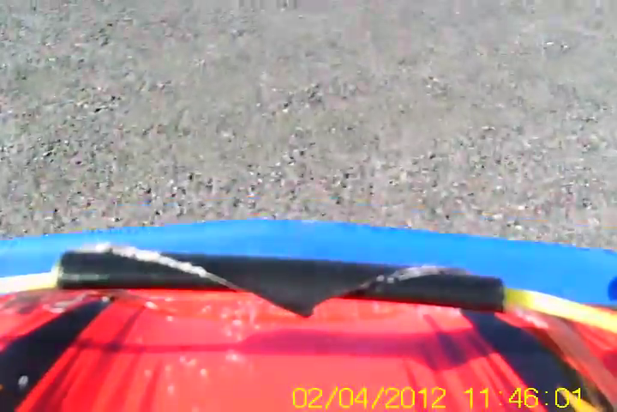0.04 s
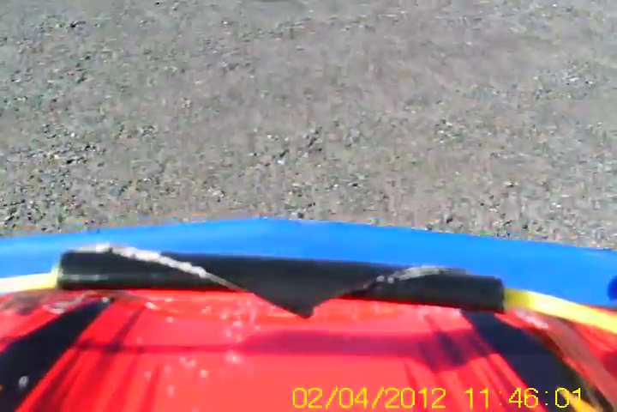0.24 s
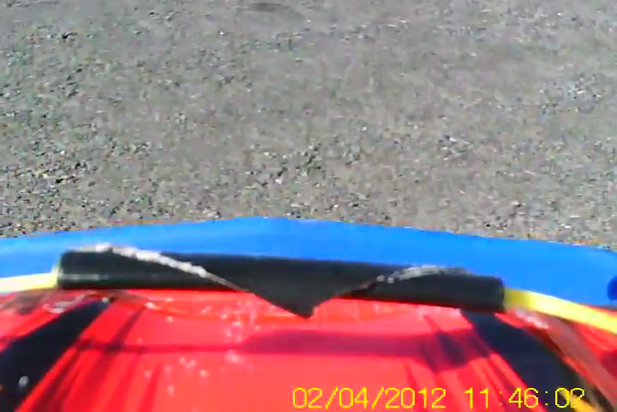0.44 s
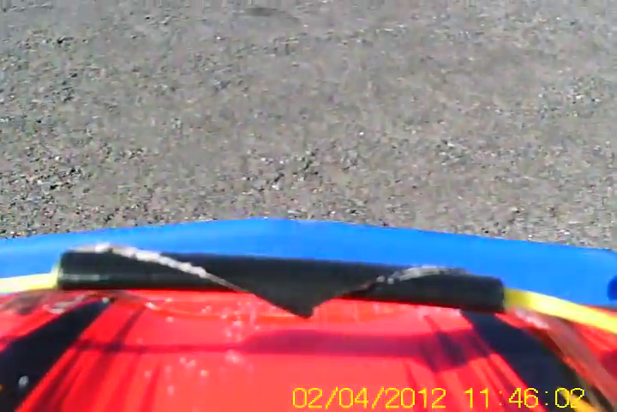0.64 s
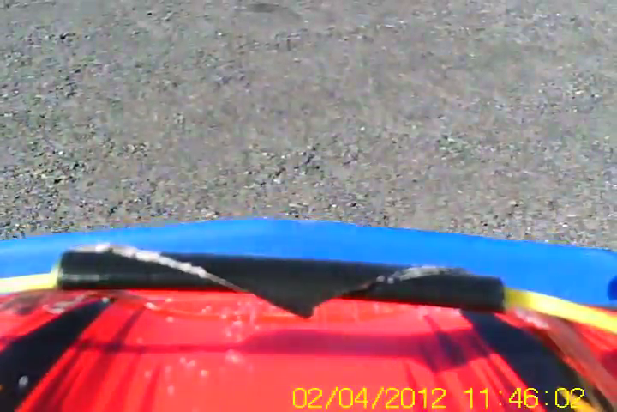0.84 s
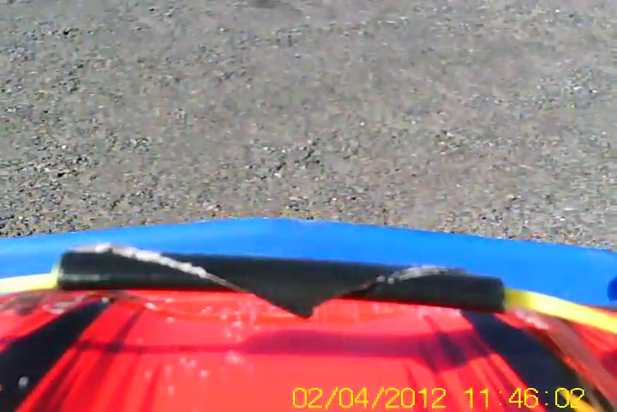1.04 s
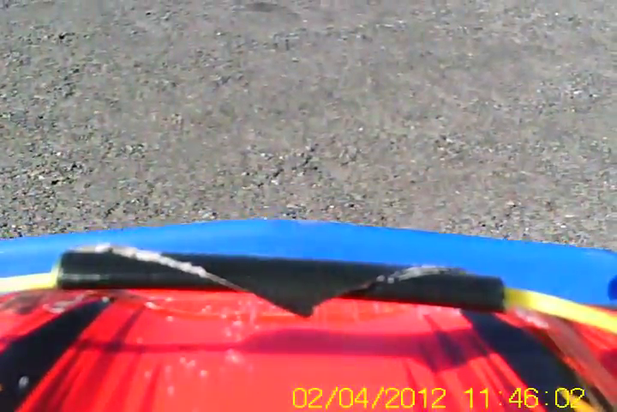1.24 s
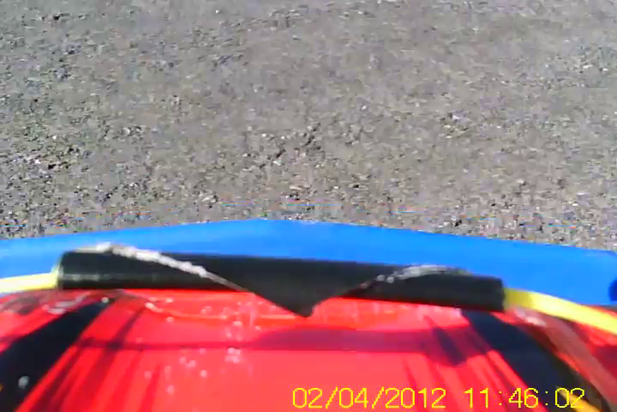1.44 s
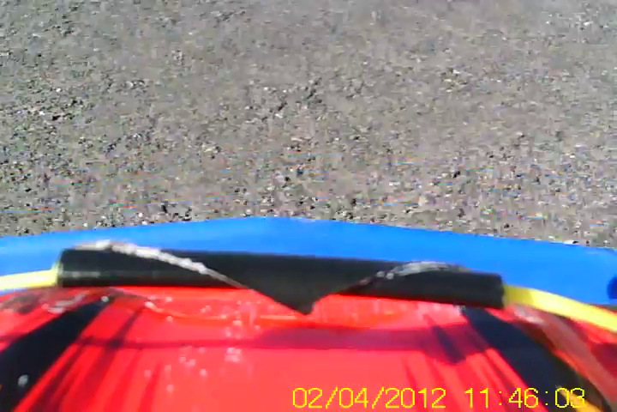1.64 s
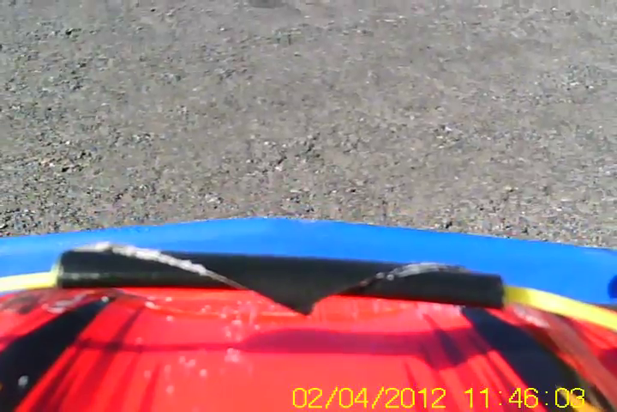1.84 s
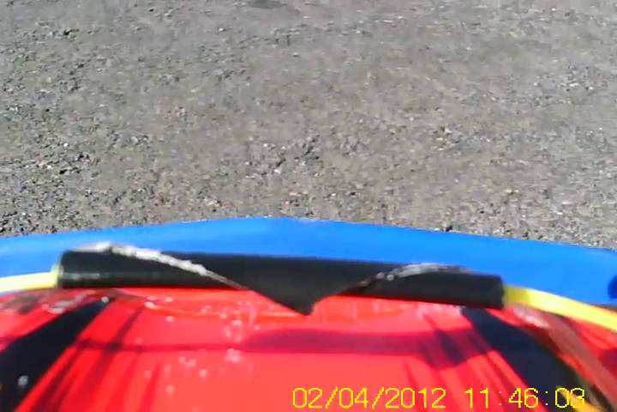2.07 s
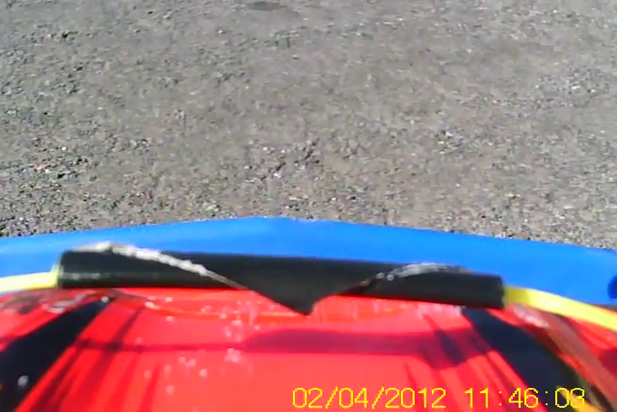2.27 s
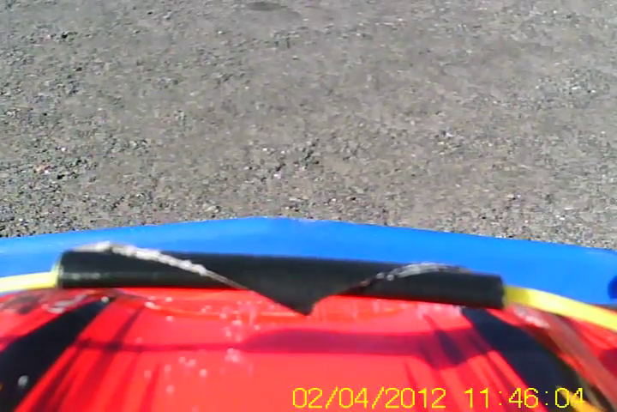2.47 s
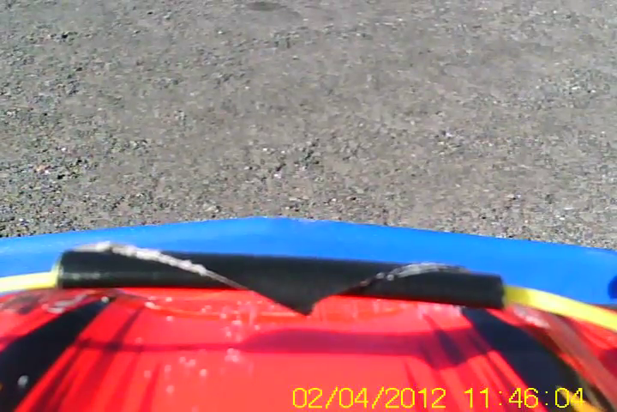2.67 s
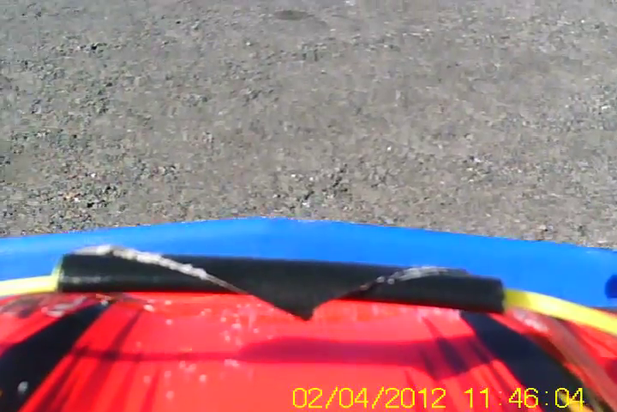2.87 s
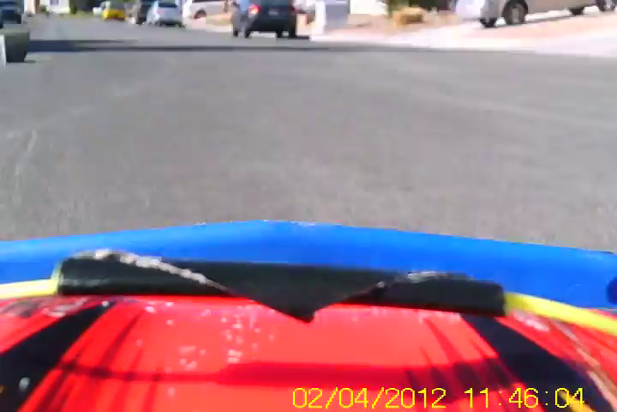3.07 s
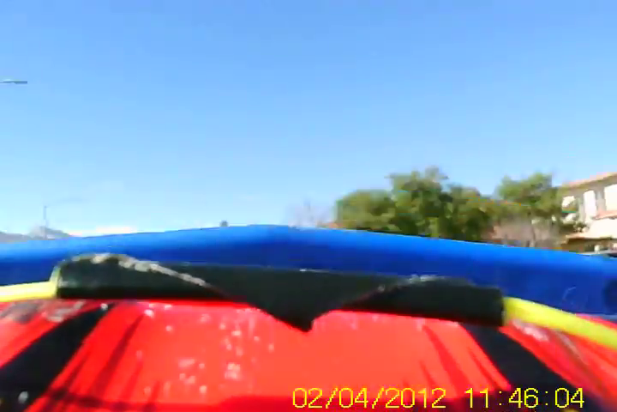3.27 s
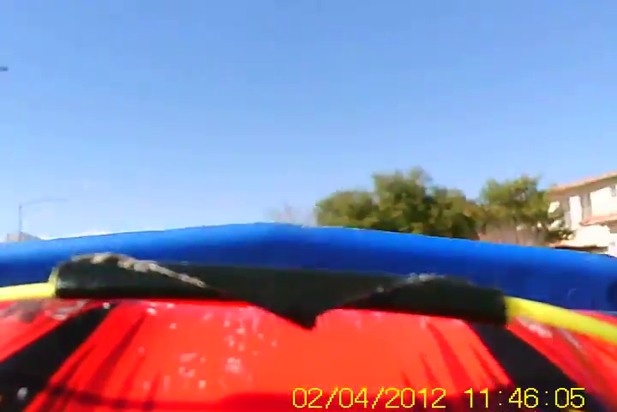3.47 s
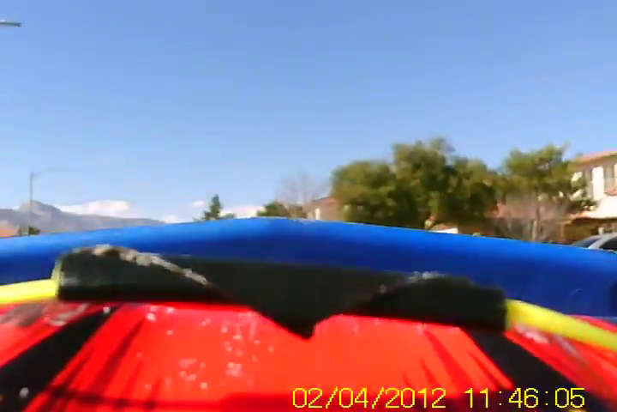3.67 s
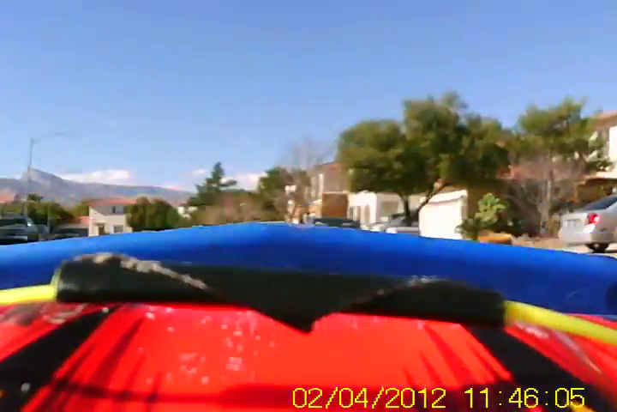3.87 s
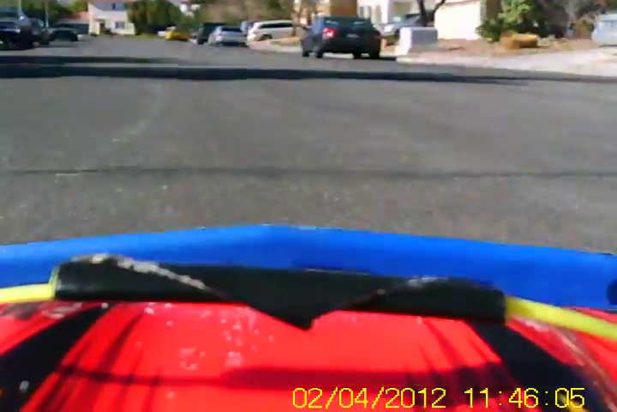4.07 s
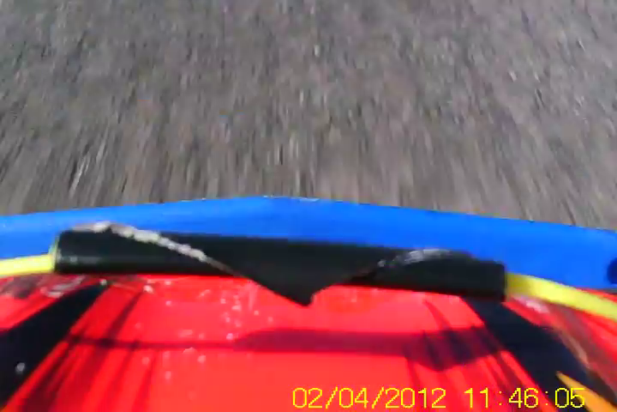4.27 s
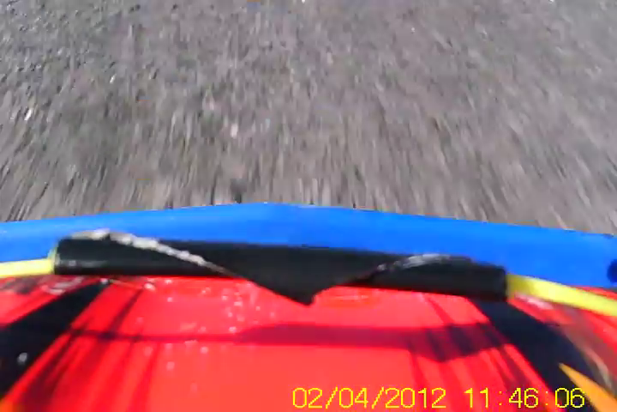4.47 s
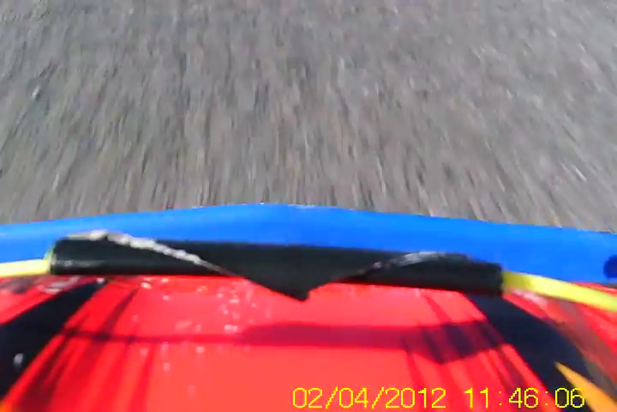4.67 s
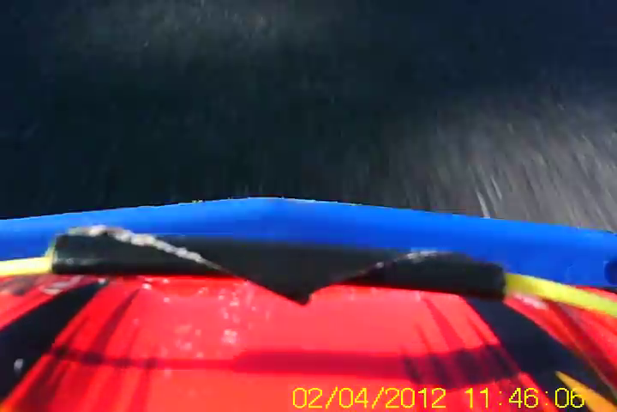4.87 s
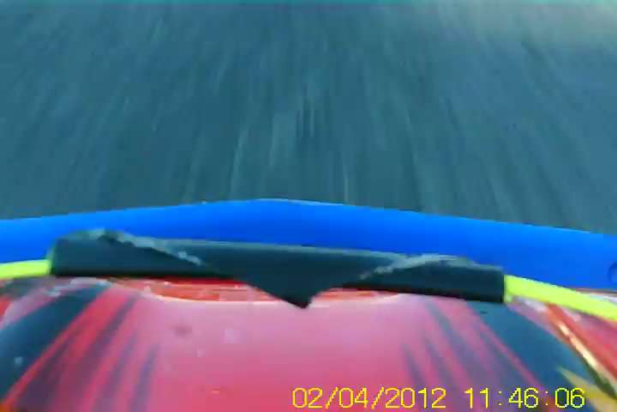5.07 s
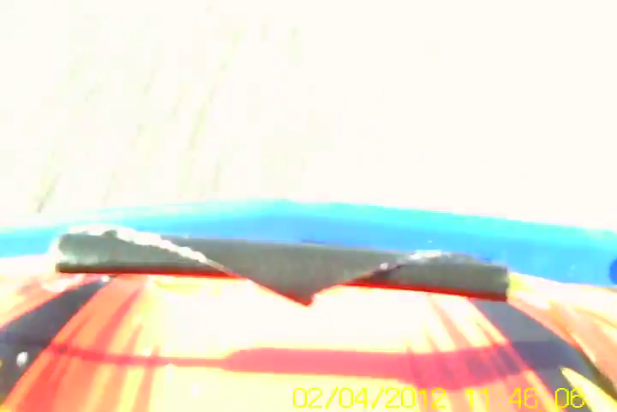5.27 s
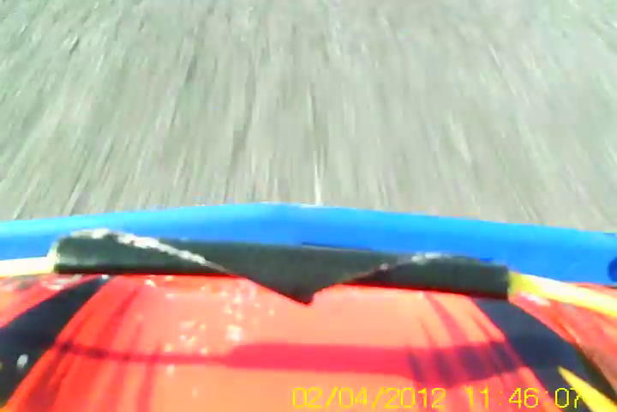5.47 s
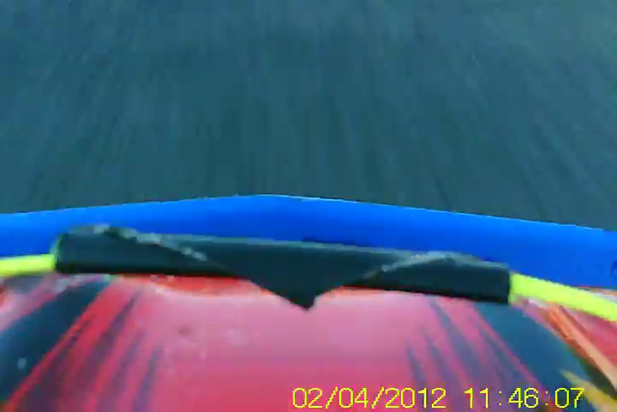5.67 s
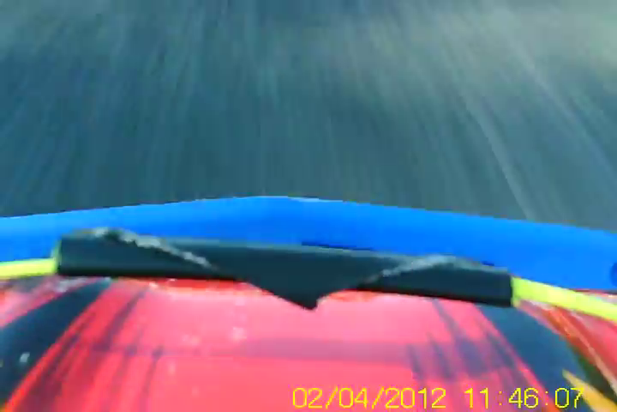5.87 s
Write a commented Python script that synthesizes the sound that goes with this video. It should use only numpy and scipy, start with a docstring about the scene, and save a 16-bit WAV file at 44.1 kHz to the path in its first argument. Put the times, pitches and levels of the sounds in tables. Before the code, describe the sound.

A toy car's shell ticks and gets one sharp bang, then its tiny motor chirps, surges, clatters and climbs into a rough gear whine with tyre rumble.

```python
"""Toy electric car: handled, knocked, driven off

A microphone rides on the plastic shell: rough gear tones filtered by shell resonances make the whine.
Filtered random contacts make the tyre rumble, rattle, scrape, jolts, ticks and rubbing.
At rest the shell ticks and takes one hard knock (a noise burst with rebounds); a small motor chirps.
Then the car lurches off in surges and runs up to full speed, over puffs of air, a faint hum and hiss."""
import sys
import numpy as np
from scipy import signal
from scipy.fft import rfft, irfft
from scipy.io import wavfile

SR = 44100
rng = np.random.default_rng(int(sys.argv[2]) if len(sys.argv) > 2 else 0)


def master_out(mix):
    """Clip the mix to full scale and print it as 16-bit PCM to the path in sys.argv[1]."""
    frames = np.transpose(np.atleast_2d(mix))
    ceiling = np.clip(frames, -1, 1)
    pcm = np.round(ceiling * 32767).astype(np.int16)
    wavfile.write(sys.argv[1], SR, pcm)


N = 260631
TIME = np.arange(N) / SR


def from_db(db):
    """Decibels to gain."""
    return 10 ** (np.asarray(db) / 20)


def rms_one(x):
    """Scale to unit power."""
    return x / np.sqrt(np.mean(x ** 2) + 1e-20)


def onset(start_s, attack_s):
    """Linear rise from 0 to 1."""
    return np.clip((TIME - start_s) / attack_s, 0, 1)


def swell(peak_s, rise_s, fall_s):
    """Bell-shaped rise to 1 and fall."""
    width_s = np.where(TIME < peak_s, rise_s, fall_s)
    return np.exp(-np.minimum(((TIME - peak_s) / width_s) ** 2, 40))


def drift(cutoff_hz):
    """Low-passed noise of unit power."""
    low_pass = signal.butter(2, cutoff_hz, fs=SR, output="sos")
    settled = signal.sosfilt(low_pass, rng.standard_normal(N + SR))[SR:]
    return rms_one(settled)


def colour(x, spectrum, size=8192):
    """Minimum-phase filter through the spectrum's points, steep outside; keeps the power of white noise."""
    hz, db = np.transpose(spectrum)
    octave = np.log2(np.maximum(np.fft.rfftfreq(size, 1 / SR), 2))
    points = np.log2(hz)
    outside = np.abs(octave - np.clip(octave, points[0], points[-1]))
    gain_db = np.interp(octave, points, db) - np.minimum(36 * outside, 70)
    cepstrum = irfft(np.log(from_db(gain_db)))
    cepstrum[1:size // 2] *= 2  # fold to minimum phase
    response = irfft(np.exp(rfft(cepstrum[:size // 2], size)))
    return signal.fftconvolve(x, response / np.linalg.norm(response))[:N]


def grains(per_s, spread_db):
    """Random tiny contacts of uneven strength, unit power."""
    strength = from_db(spread_db * np.minimum(rng.exponential(1, N), 4))
    signs = rng.choice([-1, 1], N)
    return rms_one(strength * signs * (rng.random(N) < per_s / SR))


def bursts(rows, t60, tail_db, tail_t60):
    """Contact envelopes: each holds for its length, then dies quickly over a weak, slower tail."""
    power = np.zeros(N)
    for start_s, db, length_s in rows:
        start = int(start_s * SR)
        age = TIME[:N - start][:SR // 2]
        past = np.maximum(age - length_s, 0)
        shape = from_db(-60 * past / t60) + from_db(tail_db - 60 * past / tail_t60)
        power[start:][:len(age)] += (from_db(db) * shape) ** 2
    return np.sqrt(power)


def tones(hz, table):
    """Partials locked to one rate, unit power in sum; roughness blurs each into a narrow band."""
    phase = 2 * np.pi * np.cumsum(hz) / SR
    out = 0
    for multiple, db, rough, width_hz in table:
        blur = rough * (drift(width_hz) + 1j * drift(width_hz)) / np.sqrt(2)
        line = np.sqrt(1 - rough ** 2) + blur
        out = out + from_db(db) * np.real(line * np.exp(1j * multiple * phase))
    return rms_one(out)


GO_S, THROTTLE_ATTACK_S, GRIP_S = 2.762, .032, 3.32  # moves off; tyres hold
GRIP_HZ, TOP_HZ = 988, 1780  # gear mesh rate at grip and its limit

# wheels spin up and catch: (peak time [s], mesh rate [Hz], rise [s], fall [s], effort [dB])
WHEEL_SURGES = [(2.791, 1190, .07, .09, -7), (2.888, 1190, .054, 0.044, -1),
                (2.959, 1215, .052, 0.058, -3.5), (3.082, 1610, .165, .065, -1),
                (3.147, 1290, 0.0995, 0.1306, -1.5), (3.228, 1669, .085, .114, 3.5)]


def drive(run_up_s=.89, gather_s=.6, bog_db=1, recover_s=.2):
    """Mesh rate [Hz], effort and road speed (0-1): surges, a brief bog as the tyres hold, one long run-up."""
    peak_s, peak_hz, rise_s, fall_s, effort_db = np.transpose(WHEEL_SURGES)
    spins = np.array([swell(*shape) for shape in zip(peak_s, rise_s, fall_s)])
    approach = np.exp((GRIP_S - np.maximum(TIME, GO_S)) / run_up_s)
    run_up_hz = TOP_HZ - (TOP_HZ - GRIP_HZ) * approach
    mesh_hz = np.maximum((peak_hz[:, None] * spins).max(axis=0), run_up_hz)
    surging = (from_db(effort_db)[:, None] * spins ** 0.75).max(axis=0)
    bog = from_db(bog_db * (onset(GRIP_S, recover_s) - 1))
    pulling = onset(GRIP_S - THROTTLE_ATTACK_S, THROTTLE_ATTACK_S) * bog
    effort = onset(GO_S, THROTTLE_ATTACK_S) * np.maximum(surging, pulling)
    speed = 1 - np.exp(-np.maximum(TIME - GO_S, 0) / gather_s)
    return mesh_hz, effort, speed


# gear squeals under load: (peak time [s], multiple of mesh rate, level [dB], rise [s], fall [s])
GEAR_SQUEALS = [(2.796, 2, -28.5, .012, 0.035), (2.81, 1, -34, 0.11, 0.048), (2.891, 2, -21, 0.023, 0.036),
                (2.93, 1, -42.5, .06, 0.045), (2.968, 2, -21, 0.025, 0.017), (3.035, 2, -25.5, 0.059, 0.11),
                (3.052, 1.5, -19, 0.038, 0.021), (3.044, .5, -32.5, 0.043, 0.045),
                (3.262, 1, -22.5, 0.013, 0.047), (3.303, 2, -13, 0.0056, 0.01),
                (3.4, 2, -21.5, .025, 0.022)]
# rough line and two weak partners: (multiple, relative level [dB], roughness [0-1], line width [Hz])
SQUEAL_PARTIALS = [(1, 2.5, 0.7, 56), (1.135, -20, 0.6, 94), (.865, -9.5, 0.98, 99)]


def squeals(mesh_hz):
    """Loaded teeth squeal briefly on one multiple of the mesh rate."""
    out = 0
    for peak_s, multiple, db, rise_s, fall_s in GEAR_SQUEALS:
        out = out + from_db(db) * swell(peak_s, rise_s, fall_s) * tones(multiple * mesh_hz, SQUEAL_PARTIALS)
    return out * onset(GO_S, THROTTLE_ATTACK_S)


# gear mesh partials: (multiple of mesh rate, relative level [dB], roughness [0-1], line width [Hz])
GEAR_PARTIALS = [(.36, -26, .6, 32), (.545, -15.5, 0.14, 29), (1, 4, 0.7, 32), (1.27, -7, 0, 10),
                 (1.45, -18, 0.9, 45), (1.82, -11, 0.3, 15), (2, 1, 1, 27), (3, 8, 0.8, 93),
                 (3.8, 2, 1, 41), (3.91, 7.5, 0.77, 87), (4, 9, 0.79, 43), (4.09, -10, .8, 35),
                 (4.45, 0.5, 1, 83), (5, -2, 1, 25), (6, -14.5, 1, 43), (7.84, -0.5, 0.97, 200)]
# shell transmission: (frequency [Hz], relative gain [dB])
SHELL_RESPONSE = [(500, -6), (680, 11), (850, -14), (1100, 10), (1700, -0.5), (1950, 0.5), (2230, 10.5),
                  (2700, -1), (3450, 0.5), (4200, -6.5), (4850, -5), (5130, -17.5), (5400, -4.5),
                  (5850, 0.5), (6900, -10), (7300, -10), (8200, 1.5), (8650, -1.5), (9200, 0), (10700, -8),
                  (11600, -22)]


def gears(mesh_hz, effort, speed, whine_db=-27.5, pull_db=7, flat_out_db=4):
    """Unsteady mesh tones sweep through shell resonances, boosted under pull and again flat out."""
    pull = 1 - mesh_hz / TOP_HZ
    flat_out = (mesh_hz / TOP_HZ) ** 19.2  # rises late in the run-up
    # unsteadiness as shares of the mesh rate
    stutter = 0.0186 * (1 - onset(GRIP_S, 0.29)) + 0.014 * flat_out
    unsteady_hz = mesh_hz * (1 + 0.002002 * drift(15.4) + stutter * drift(251.0))
    whine = colour(tones(unsteady_hz, GEAR_PARTIALS), SHELL_RESPONSE)
    whine = whine / np.std(whine[TIME > GRIP_S])
    level = from_db(whine_db + pull_db * pull + flat_out_db * flat_out) * effort * speed ** 0.82
    return level * whine + squeals(unsteady_hz)


# body panel resonance: (frequency [Hz], relative density [dB/Hz])
PANEL_SPECTRUM = [(560, -15.5), (690, -1.5), (800, -17)]


def panel_hum(level_db=-32):
    """The straining drive sets a body panel humming: dense contacts through its resonance."""
    envelope = swell(3.466, rise_s=0.47, fall_s=0.13) * onset(GO_S, THROTTLE_ATTACK_S)
    return from_db(level_db) * envelope * colour(grains(2300, 1.9), PANEL_SPECTRUM)


# tooth scrape: (frequency [Hz], relative density [dB/Hz])
SCRAPE_SPECTRUM = [(4300, -1), (4850, -3), (5200, -6), (5600, 6), (6020, 5.5), (6270, 3), (6430, -5),
                   (6900, 5.5), (7300, -6), (7900, 4), (8650, -2.5), (9100, -7), (10700, -11.5),
                   (12300, -32)]


def tooth_scrape(mesh_hz, effort, speed, level_db=-30, throb=0.035):
    """Teeth hiss as they slide, slightly harder once per motor turn."""
    turns = np.cumsum(mesh_hz) / SR / 11  # eleven teeth on the pinion
    scrape = rms_one((1 + throb * np.cos(2 * np.pi * turns)) * from_db(1.2 * drift(120)))
    level = from_db(level_db) * effort * (mesh_hz / TOP_HZ) ** 0.61 * speed ** 0.52
    return level * colour(scrape * grains(14000, 2.7), SCRAPE_SPECTRUM)


# loose plastic: (frequency [Hz], relative density [dB/Hz])
RATTLE_SPECTRUM = [(530, -27.5), (900, -12), (990, -13.5), (1220, -12.5), (1450, -6), (1670, -4),
                   (1810, -5.5), (1930, -4), (2140, 0), (2670, -4.5), (3500, -4.5), (4050, -9.5),
                   (4760, -11.5), (5200, -21), (6760, -52), (11400, -120)]


def rattle(effort, level_db=-25.5):
    """Loose plastic rattles with motor effort, its level flickering."""
    return from_db(level_db + 0.9 * drift(78)) * effort * colour(grains(7000, 1.2), RATTLE_SPECTRUM)


# tyre thumps over road seams: (peak time [s], level re rumble [dB])
SEAM_THUMPS = [(3.66, 4), (3.895, 7), (4.06, 4), (4.281, 0), (4.52, -6), (5.56, 5.5), (5.88, -8)]
# tread drumming on grit, also the thud of jolts: (frequency [Hz], relative density [dB/Hz])
TREAD_SPECTRUM = [(65, 8), (110, -2), (284, -2.5), (437, -2), (503, -4.5), (821, -6.5), (992, -11.5),
                  (1200, -7), (1560, -41), (2640, -120)]
# tyre rumble: (frequency [Hz], relative density [dB/Hz])
RUMBLE_SPECTRUM = [(8.8, -24), (15, -2), (54, 0.5), (113, -14.5), (170, -17), (220, -73), (370, -120)]


def tyres(speed, tread_db=-28.5, rumble_db=-24.0, thump_s=.022):
    """Tyres drum on grit and rumble, growing with road speed; seams swell the rumble into thumps."""
    thumps = sum(from_db(db) * swell(peak_s, thump_s, thump_s) for peak_s, db in SEAM_THUMPS)
    tread = from_db(tread_db) * speed ** 1.38 * colour(grains(2500, 2.6), TREAD_SPECTRUM)
    rumble = from_db(rumble_db) * speed ** 1.6 * (1 + thumps) * colour(grains(900, 3.7), RUMBLE_SPECTRUM)
    return tread + rumble


# chassis jolts: (time [s], level [dB], length [s])
CHASSIS_JOLTS = [(2.789, -34, 0.0091), (3.088, -19, 0.0091), (3.101, -11.5, 0.0057), (3.182, -14.5, 0.0099),
                 (3.198, -23, 0.0051), (3.224, -34, 0.0062), (3.254, -25, 0.021), (3.394, -20, 0.0073),
                 (3.412, -19, 0.015), (3.435, -20, 0.012), (3.464, -19.5, 0.013), (3.482, -15.5, 0.0079),
                 (3.5, -18.5, 0.015), (3.556, -22, 0.011), (3.681, -16.5, 0.012)]
# sharp snaps among them: (time [s], relative level [dB])
JOLT_SNAPS = [(3.1058, -2), (3.1094, -7), (3.47, -2), (3.505, -15), (3.692, -3.5)]


def jolts(thud_db=-7, snap_gain=1.84):
    """Bumps throw the chassis against its stops: chattering clatter, dull thud and a few impulsive snaps."""
    shaking = bursts(CHASSIS_JOLTS, t60=0.063, tail_db=-40, tail_t60=.08) * grains(6500, 2.0)
    impulses = np.zeros(N)
    for time_s, db in JOLT_SNAPS:
        impulses[int(time_s * SR)] = from_db(db)
    clatter = colour(shaking, [(600, -5), (1200, 0.0), (2200, 0), (3500, 2.0),
                               (4300, -7.5), (6000, -9), (10500, -24)])
    thud = from_db(thud_db) * colour(shaking, TREAD_SPECTRUM)
    snaps = snap_gain * colour(impulses, [(2000, -24), (9000, 6.5), (11500, -2.5), (13000, -22)])
    return clatter + thud + snaps


# hard knock and rebounds: (time [s], level [dB], length [s])
KNOCK_HITS = [(1.4672, -9, 0.014), (1.485, -20, 0.0076), (1.492, -29, 0.007), (1.506, -35, 0.011),
              (1.529, -43, 0.0065), (1.539, -46.5, 0.0095), (1.559, -58, 0.011)]
# knock body: (frequency [Hz], relative density [dB/Hz])
KNOCK_SPECTRUM = [(30, -8.5), (70, -8), (130, 2.5), (260, -1), (400, -0.5), (700, -5), (1100, -8),
                  (1400, -6), (3100, -8.5), (6000, -20), (11000, -27)]


def knock(crack_db=5.5, echo_db=-36, echo_t60=0.2):
    """Hard blow by the microphone: harder contacts are brighter, and the hollow shell rings on."""
    force = bursts(KNOCK_HITS, t60=0.01, tail_db=-31, tail_t60=.1)
    blow = colour(force * rng.standard_normal(N), KNOCK_SPECTRUM)
    crack = colour(force ** 1.8 * rng.standard_normal(N),
                   [(2000, -7.5), (5000, 0.5), (10000, -0.5), (12000, -13.5)])
    age = TIME - KNOCK_HITS[0][0]
    decay = from_db(echo_db - 60 * np.abs(age) / echo_t60) * (age > 0)
    hollow = colour(decay * rng.standard_normal(N), [(250, -5), (600, 2.5), (1800, -7.0), (4000, -19)])
    return blow + from_db(crack_db) * crack + hollow


# small motor run: (time [s], frequency [Hz], relative level [dB])
MOTOR_RUN = [(2.66, 1374, -48), (2.675, 1493, -43), (2.685, 1843, -35.5), (2.7, 2070, -34),
             (2.712, 2210, -30), (2.727, 2170, -32.5), (2.738, 1810, -37), (2.77, 1880, -61),
             (2.785, 1720, -70)]
# motor partials: (multiple, relative level [dB], roughness [0-1], line width [Hz])
MOTOR_PARTIALS = [(1.002, -8, 0.8, 70), (2, -3, 0.1, 110), (2.999, -9, 0.7, 260), (3.918, -8, .8, 178),
                  (4.5, -27, 0.9, 900), (2.1, -16, 0.8, 700)]
# shell resonances under the brushes: (frequency [Hz], relative density [dB/Hz])
BRUSH_SPECTRUM = [(1700, -14), (2100, 3), (2650, -19), (3650, 4.5), (4000, -12), (4450, 14), (5300, -36),
                  (6050, 4), (6900, -12), (7300, -27), (8600, 4), (9300, -6), (11500, -23)]


def chirp(brush_db=-3.0, tone_db=-5.0, fade_s=.02):
    """A small unloaded motor spins up and stops: stuttering tones and brush rasp."""
    time_s, run_hz, run_db = np.transpose(MOTOR_RUN)
    hz, db = np.interp(TIME, time_s, run_hz), np.interp(TIME, time_s, run_db)
    start_s, end_s = time_s[0], time_s[-1]
    gate = np.interp(TIME, [start_s - fade_s, start_s, end_s, end_s + fade_s], [0, 1, 1, 0])
    whizz = tones(hz * (1 + .008 * drift(220)), MOTOR_PARTIALS)
    rasp = colour(grains(7700, 0.81), BRUSH_SPECTRUM)
    return from_db(db) * (from_db(tone_db) * whizz + from_db(brush_db) * rasp) * gate


# rubbing spells: (start [s], end [s], relative level [dB], fade [s])
RUB_SPELLS = [(0, 0.18, -49, 0.15), (0.532, 0.836, -56.5, 0.072), (1.066, 1.215, -56, .12),
              (1.415, 1.55, -57, .06), (1.977, 2.055, -68.5, 0.046), (2.584, 2.65, -47.5, 0.12)]


def rubbing(slips_per_s=47, slip_s=.005, slip_share=0.67):
    """Stick-slip pressure on the shell: spells set in fast, hold and fade, broken into random slips."""
    spells = 0
    for start_s, end_s, db, fade_s in RUB_SPELLS:
        fade = np.exp(-np.maximum(TIME - end_s, 0) / fade_s)
        spells = spells + from_db(db) * onset(start_s, .01) * fade
    starts = rng.random(N) < slips_per_s / SR
    slips = rms_one(signal.lfilter([1], [1, -np.exp(-1 / (slip_s * SR))], starts))
    return spells * np.sqrt(1 - slip_share + slip_share * slips ** 2)


# shell ticks at rest: (time [s], relative level [dB], length [s], ring [Hz])
SHELL_TICKS = [(.003, -44, 0.011, 3480), (0.028, -39.5, 0.0041, 3570), (.047, -48, .006, 850),
               (0.071, -40, .008, 830), (0.087, -44.5, 0.037, 1840), (.103, -39, .003, 1760),
               (.167, -45, 0.0095, 855), (.189, -46, 0.0044, 3540), (0.203, -35.5, 0.0043, 3400),
               (.26, -48.5, .005, 3470), (0.281, -53.5, 0.0068, 2700), (.548, -45.5, 0.01, 2920),
               (0.567, -47, .006, 3180), (.636, -42.5, 0.0037, 3420), (0.674, -39, 0.0092, 890),
               (0.696, -48.5, .0043, 3530), (0.763, -58, 0.0034, 880), (0.818, -45, 0.023, 2160),
               (.852, -44.5, .01, 2680), (1.049, -43, 0.003, 3440), (1.195, -43.5, .012, 1830),
               (1.246, -49, .015, 2200), (1.332, -48, 0.0019, 2650), (1.39, -52, .004, 2680),
               (1.699, -57.5, .005, 2580), (1.977, -57.5, 0.0063, 3650), (2.077, -59.5, 0.004, 800),
               (2.536, -49, 0.074, 1660), (2.58, -36.5, 0.007, 2030)]
# shell resonances when ticking: (frequency [Hz], relative density [dB/Hz])
TICK_SPECTRUM = [(130, -1), (450, -3), (640, -9), (820, 6), (1100, -7.5), (1600, -1.5), (2100, 0.5),
                 (2400, -9.5), (2750, -1.5), (3100, -15), (3550, -1.5), (4050, -14), (4400, -13),
                 (5200, -15.5), (6200, -13), (7200, -24.5), (9000, -22), (12000, -40)]


def handling(rub_db=-4.5, ring_db=-4, ring_width_hz=220, crack_db=-6):
    """The handled shell rubs and ticks; each tick excites one panel resonance."""
    contacts, rings = grains(7900, 1.3), np.zeros(N)
    for time_s, db, length_s, hz in SHELL_TICKS:
        span = slice(int(time_s * SR), int(time_s * SR) + SR // 5)
        force = from_db(db - 60 * np.maximum(TIME[:SR // 5] - length_s, 0) / 0.006)
        resonator = signal.iirpeak(hz, hz / ring_width_hz, fs=SR)
        ring = signal.lfilter(*resonator, force * contacts[span])
        rings[span] += ring * np.linalg.norm(force) / np.linalg.norm(ring)  # ring takes the tick's energy
    cracks = bursts([row[:3] for row in SHELL_TICKS], t60=.016, tail_db=-21.5, tail_t60=0.1177)
    pressure = from_db(crack_db) * cracks + from_db(rub_db) * rubbing()
    return colour(pressure * grains(8200, 1.5), TICK_SPECTRUM) + from_db(ring_db) * rings


def squeak(hz=1870, level_db=-30):
    """Plastic slips on plastic: one short, rough tone."""
    envelope = swell(.106, rise_s=.005, fall_s=.003)
    return from_db(level_db) * envelope * tones(np.full(N, hz), SQUEAL_PARTIALS)


# air puffs at the microphone: (peak time [s], level [dB], width [s])
AIR_PUFFS = [(.66, -44, 0.3), (.92, -37, 0.058), (1.16, -38, 0.2), (1.5, -40, .12)]
# moving air: (frequency [Hz], relative density [dB/Hz])
BREEZE_SPECTRUM = [(10, 7), (22, -2.5), (35, -2), (60, -12), (100, -17), (160, -26), (240, -34.5),
                   (320, -33.5), (500, -39), (800, -52.5)]


def breeze(calm_db=-47.5):
    """Low air noise at the microphone, swelling in puffs."""
    puffs = sum(from_db(db) * swell(peak_s, width_s, width_s) for peak_s, db, width_s in AIR_PUFFS)
    return (from_db(calm_db) + puffs) * colour(rng.standard_normal(N), BREEZE_SPECTRUM)


def hum(hz=207, peak_db=-54, swell_db_per_s=10.5, drop_db=15.5, fade_db_per_s=6.5):
    """A faint hum swells up to the knock, drops there and fades."""
    age = TIME - KNOCK_HITS[0][0]
    change_db = np.where(age < 0, swell_db_per_s * age, -drop_db - fade_db_per_s * age)
    partials = [(1, -1.5, .25, 5), (.5, -7.5, .6, 5.9), (0.6, -14, .6, 6)]
    return from_db(peak_db + change_db) * tones(np.full(N, hz), partials)


# camera whistles: (frequency [Hz], RMS level [dB])
ELECTRONIC_TONES = [(1200, -82.5), (3892, -82.5), (5599, -82.5), (7402, -86)]
# camera hiss: (frequency [Hz], relative density [dB/Hz])
FLOOR_SPECTRUM = [(180, -42), (300, -15.5), (1220, -13), (2640, -18), (4010, -19), (4470, -20),
                  (5810, -16.5), (12000, -23), (15600, -53.5), (22000, -120)]


def electronics(hiss_db=-72):
    """The camera's electronics: thin steady sines and shaped hiss."""
    whistles = sum(from_db(db) * np.sqrt(2) * np.sin(2 * np.pi * hz * TIME) for hz, db in ELECTRONIC_TONES)
    return whistles + from_db(hiss_db) * colour(rng.standard_normal(N), FLOOR_SPECTRUM)


def scene():
    """All sources sum at one microphone on the car."""
    mesh_hz, effort, speed = drive()
    car = gears(mesh_hz, effort, speed) + panel_hum() + jolts()
    car = car + tooth_scrape(mesh_hz, effort, speed) + rattle(effort) + tyres(speed)
    shell = knock() + handling() + squeak()
    background = breeze() + hum() + electronics()
    return (car + chirp() + shell + background)[None]


def record(dry, top=0.85, edge_hz=11500, cutoff_hz=16000):
    """The small camera loses the top treble and saturates on hard blows."""
    treble_cut = signal.cheby1(8, .3, edge_hz, fs=SR, output="sos")
    dull = signal.sosfilt(treble_cut, dry)
    clipped = dull / (1 + (dull / top) ** 6) ** (1 / 6)
    band_limit = signal.ellip(10, .1, 80, cutoff_hz, fs=SR, output="sos")
    return signal.sosfilt(band_limit, clipped)


dry = scene()
out = record(dry)
master_out(out)
```